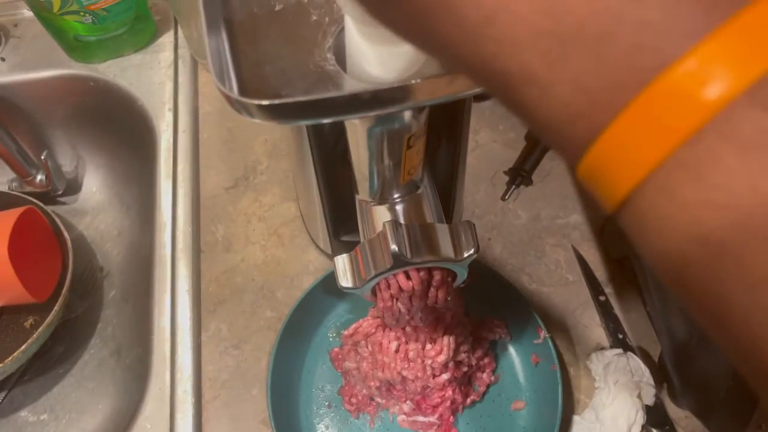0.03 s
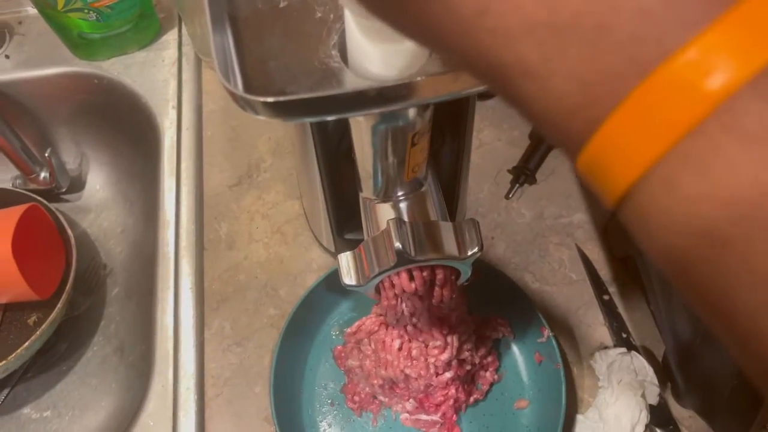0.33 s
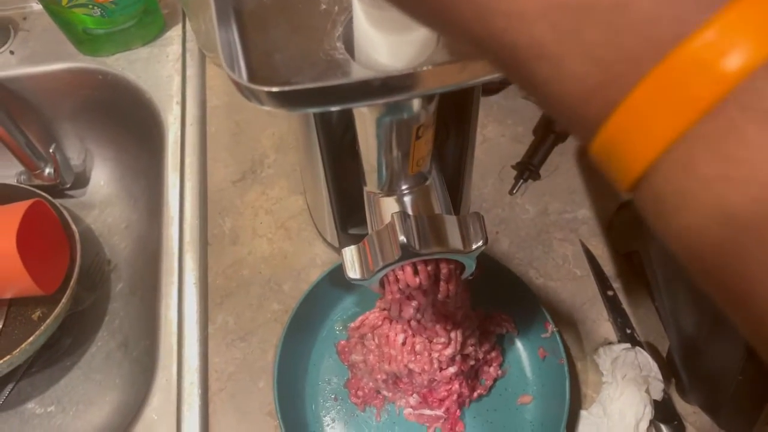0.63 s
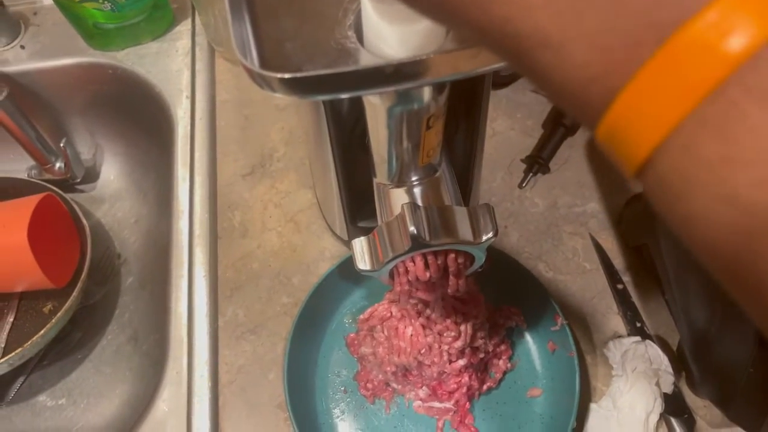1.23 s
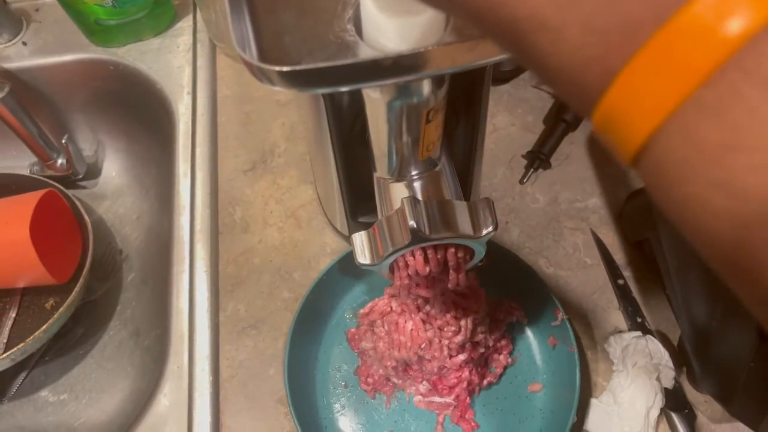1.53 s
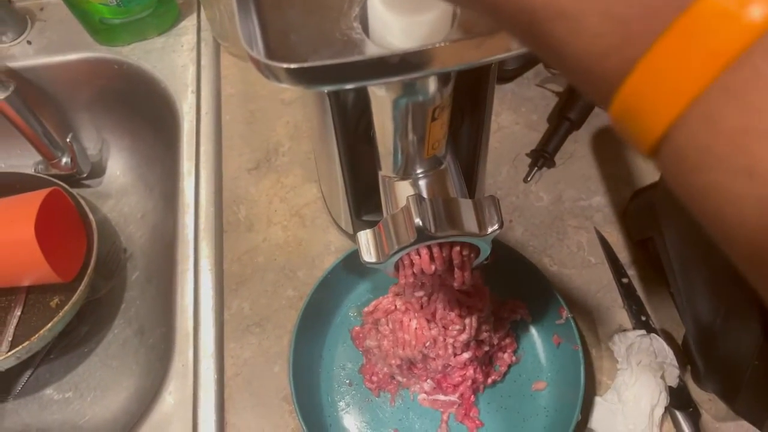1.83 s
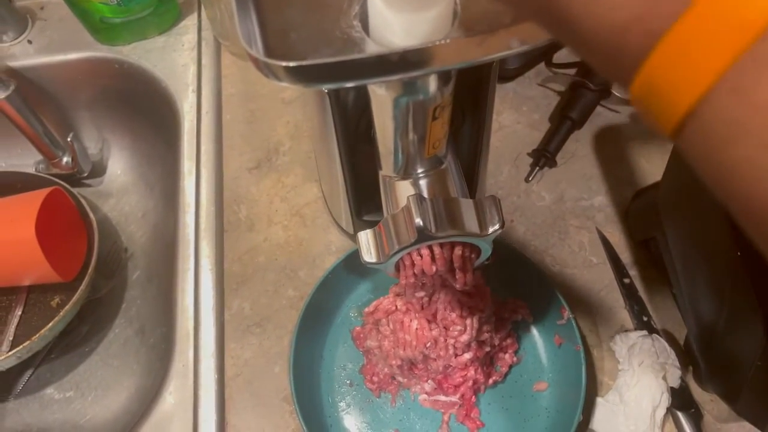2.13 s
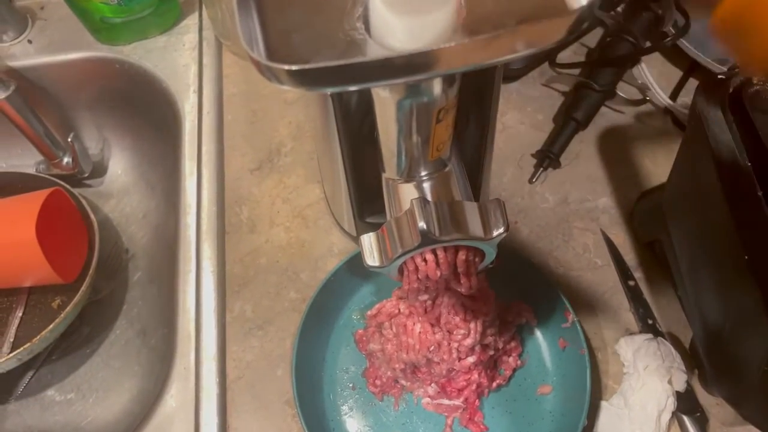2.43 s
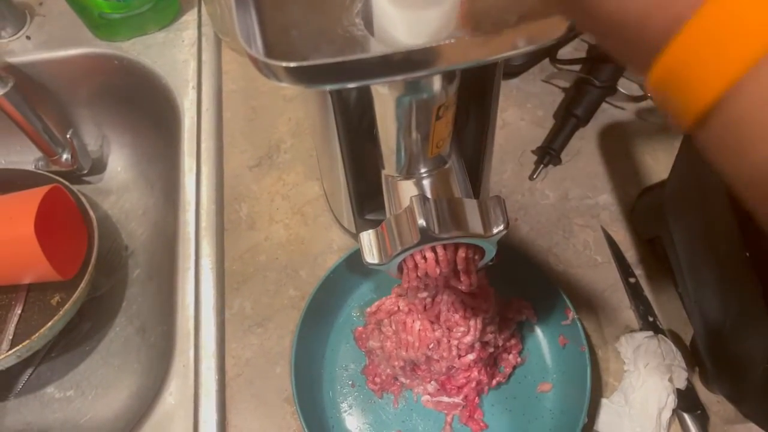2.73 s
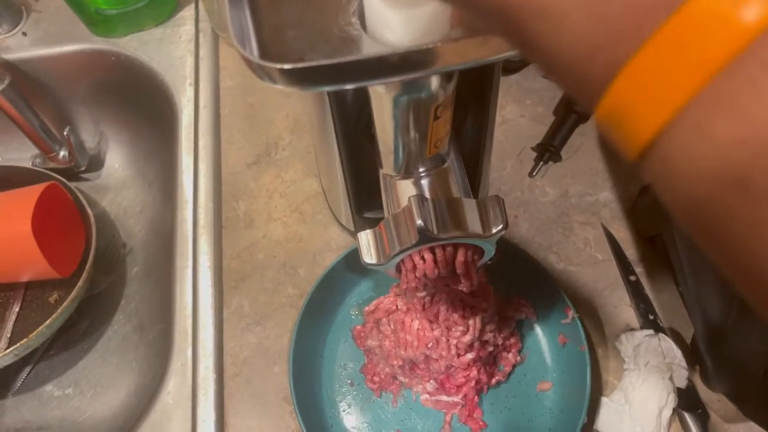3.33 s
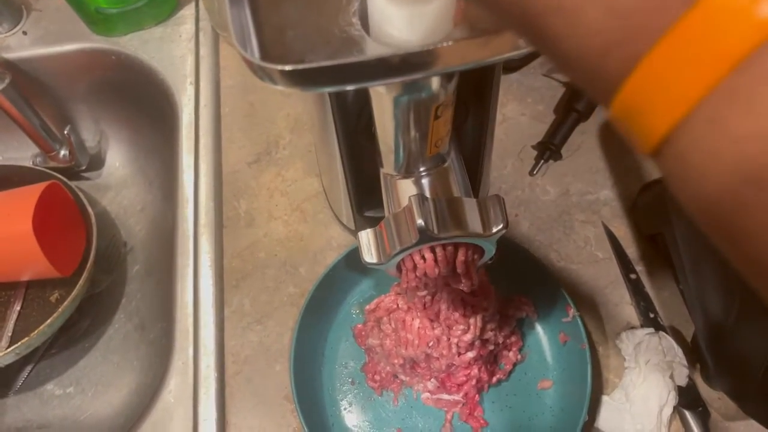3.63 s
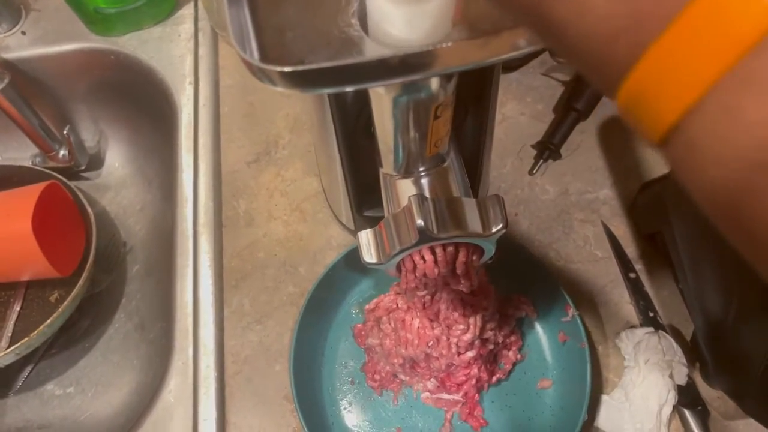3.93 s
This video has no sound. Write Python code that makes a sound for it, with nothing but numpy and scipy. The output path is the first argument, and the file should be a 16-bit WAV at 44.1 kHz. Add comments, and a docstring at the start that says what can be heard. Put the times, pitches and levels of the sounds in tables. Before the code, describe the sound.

An electric meat grinder runs close to the microphone on a kitchen counter. Its motor hums and whirs throughout while the gears rattle in uneven surges, with a few dry knocks, wet pops and faint metallic squeaks.

```python
"""A kitchen counter, with an electric meat grinder running close to a stereo microphone. Cooling air whirs, the
brushes hiss and meat crackles at the plate; the walls add a short tail. The auger rasps, the bearings squeak,
the drive whines and knocks, and housing resonances swell into short pulses. In front, the fast brush motor hums
at shaft speed and sags under load, while a small pinion rattles a larger gear, ringing the housing. The rattle
surges as the auger churns."""
import sys
import numpy as np
from scipy import signal
from scipy.fft import rfft, irfft, next_fast_len
from scipy.io import wavfile
from scipy.ndimage import map_coordinates

SR = 44100
rng = np.random.default_rng(int(sys.argv[2]) if len(sys.argv) > 2 else 0)


def to_wav(sig):
    """Store sig (one row per channel, or 1-D mono) as 16-bit WAV at the path in sys.argv[1].

    Samples outside -1..1 are clipped; the rate is SR.
    """
    pcm = np.clip(np.atleast_2d(sig), -1, 1) * 32767
    pcm = np.round(pcm).astype(np.int16)
    wavfile.write(sys.argv[1], SR, pcm.T)  # frames by channels


N = 176400
PINION_TEETH, GEAR_TEETH = 7, 54
# spectrum that the air and the knocks feed into the housing: f/Hz, relative level/dB
WHIR_SPECTRUM = [(20, -50), (42, -18), (90, -15), (125, -12), (165, -17), (240, -2.5), (330, -4), (520, -5),
                 (700, -6.5), (1000, -2), (1900, -2.5), (2400, 4), (3300, -.5), (4100, -2), (5000, -8),
                 (8000, -17), (14000, -49)]


def amp(db):
    """Decibels to gain."""
    return 10 ** (np.asarray(db) / 20)


def unit(x):
    """Scale to rms 1."""
    return x / np.sqrt(np.mean(x ** 2) + 1e-20)


def along(points, hz):
    """Read (f/Hz, value) points on a log frequency axis."""
    f, values = np.transpose(points)
    return np.interp(np.log(hz + 1), np.log(np.sort(f) + 1), values)


def wobble(rate):
    """A smooth random curve with `rate` knots a second."""
    return map_coordinates(rng.standard_normal(4096), [np.arange(N) * rate / SR + 2], mode="wrap")


def filtered(x, response):
    """Multiply the spectrum of x by response(f)."""
    size = next_fast_len(N + SR // 2)
    return irfft(rfft(x, size) * response(np.fft.rfftfreq(size, 1 / SR)), size)[..., :N]


def coloured(x, level_db):
    """A causal, minimum-phase filter with the gain level_db(f)."""
    size = 2 * next_fast_len(N)
    cepstrum = irfft(np.log(amp(level_db(np.fft.rfftfreq(size, 1 / SR)))), size)
    fold = np.r_[1, np.full(size // 2 - 1, 2), np.zeros(size // 2)]
    return irfft(rfft(x, size) * np.exp(rfft(cepstrum * fold)), size)[..., :N]


def bursts(events, t, t60_s):
    """A quickly dying burst of stereo noise for each (t/s, level/dB) event."""
    envelope = sum((t >= start) * amp(db - 60 * np.abs(t - start) / t60_s) for start, db in events)
    return envelope * rng.standard_normal((2, N))


def swell(offset, length):
    """A bell-shaped envelope, `length` wide at half power."""
    return .5 ** (2 * (offset / length) ** 2)


def panned(x, pan_db):
    """Place a signal pan_db louder on the left than on the right."""
    return x * amp(np.array([[pan_db], [-pan_db]]) / 2)


def spread(pair):
    """Two unrelated signals become the shared and the differing part at the microphone's two ports."""
    balance = [(60, 4), (250, 2), (390, 22), (540, 23), (760, 0.5), (950, 6.5), (1400, 4.5), (1900, 7),
               (2600, 2.5), (4000, 3), (4600, -5), (5900, 1), (7400, -4), (8500, -0.5)]  # tilt between the ports: f/Hz, left minus right/dB
    likeness = [(40, 0.82), (290, 0.97), (520, 0.19), (800, 1), (1400, 0.83), (2100, 0.084), (2600, 0.76),
                (3300, 0.61), (4300, 0.073), (6500, 0.68), (8500, 0.85), (9600, 0.77), (10300, 1),
                (11200, 0.55), (11800, 0.55)]  # how alike the ports sound: f/Hz, coherence/0..1
    angle = lambda f: np.arccos(np.clip(along(likeness, f), 0, 1)) / 2
    mid, side = filtered(pair, lambda f: np.array([np.cos(angle(f)), np.sin(angle(f))]))
    tilt = lambda f: amp(np.outer([1, -1], along(balance, f)) / 2)
    left_right = np.array([mid + side, mid - side])
    return filtered(left_right, lambda f: tilt(f) / np.sqrt(np.mean(tilt(f) ** 2, axis=0)))


def out_of_step(pair):
    """Sound reaches the microphone's two ports with different phases."""
    lead = [(30, .1), (280, .75), (470, .7), (560, -1.5), (800, -1), (2000, -1), (2600, -2.6), (3150, -2.8),
            (3600, -5.2), (3900, -5), (4200, -7.3), (4700, -6.5), (5500, -9.5), (5850, -12), (6400, -12.4),
            (7000, -15), (8400, -12.7), (8950, -12.4), (10300, -9.4), (11000, -8.2), (11700, -6.3)]  # phase between the ports: f/Hz, lead of the left/rad
    return filtered(pair, lambda f: np.exp(.5j * np.outer([1, -1], along(lead, f))))


def kitchen(pair, t60_s=.09, tail_db=-8.5):
    """The counter, sink and walls add a short tail."""
    t = np.arange(SR // 4) / SR
    tail = rng.standard_normal((2, len(t))) * amp(-60 * t / t60_s) * (t > .002)
    tail /= np.linalg.norm(tail[0])
    return pair + amp(tail_db) * signal.fftconvolve(pair, tail, axes=1)[:, :N]


def housing(force, spectrum):
    """A force, shaped by the given spectrum, heard through the ringing housing."""
    resonances = [(396, 43, 6), (531, 59, 11), (776, 43, 11), (1102, 97, 5.5), (1240, 27, 4.5),
                  (1403, 48, 4.5), (1736, 23, 8), (1945, 62, 5.5), (2350, 130, 3), (2598, 40, 7.5),
                  (2940, 40, 4.5), (3173, 113, 12), (3303, 55, 9), (3500, 160, 3), (3840, 120, 3.5),
                  (4030, 49, 3.5)]  # modes of the housing: f/Hz, width/Hz, lift/dB

    def lift_db(f):
        peaks = sum(abs(amp(db) ** 2 - 1) / (1 + (2 * (f - hz) / width) ** 2) ** 1.16
                    for hz, width, db in resonances)
        return 10 * np.log10(1 + peaks)
    return coloured(force, lambda f: along(spectrum, f) + lift_db(f))


def whir(level_db=-26, waver_db=.6):
    """Cooling air and bearings: a wavering rush through the housing."""
    rush = rng.standard_normal((2, N)) * amp(waver_db * wobble(27.9))
    return amp(level_db) * unit(spread(kitchen(housing(rush, WHIR_SPECTRUM))))


def brushes(speed, level_db=-35, grain_db=2.7, db_per_hz=.13):
    """Carbon scrapes on the commutator: a grainy hiss that grows with speed."""
    spectrum = [(2000, -30), (4800, -6), (5900, 0), (6300, -4), (6900, -1), (7400, -4), (7900, -2),
                (8200, -4), (9000, 0), (9400, 1), (9520, 5), (9650, 0), (10200, -2), (10750, 3),
                (11300, -2), (12000, -11), (13000, -28)]  # brush hiss: f/Hz, relative level/dB
    scrape = rng.standard_normal((2, N)) * amp(grain_db * wobble(950) + db_per_hz * (speed - speed.mean()))
    hiss = coloured(scrape, lambda f: along(spectrum, f))
    return amp(level_db) * unit(spread(kitchen(hiss)))


def meat_pops(t):
    """Meat crackles at the plate in bright, wet pops."""
    pops = [(.649, -23), (.672, -14), (.679, -14), (.962, -13), (3.291, -8.3)]  # wet pops: t/s, level before filtering/dB
    spectrum = [(500, -22), (3000, -8), (7200, -7), (8700, 0), (11500, -4), (15000, -17)]  # colour of a pop: f/Hz, gain/dB
    return coloured(bursts(pops, t, t60_s=.014), lambda f: along(spectrum, f))


def drive_knocks(t):
    """Dry knocks in the drive ring the housing."""
    knocks = [(.498, -16), (.686, -33), (.927, -23), (1.159, -19), (1.996, -13)]  # blows in the drive: t/s, level before filtering/dB
    return housing(bursts(knocks, t, t60_s=.018), WHIR_SPECTRUM)


def bearing_squeaks(t):
    """As the load eases, the bearings squeal: metal slips on metal in short, unsteady glides."""
    slips = [(2.465, .055, 3330, 3600, -38), (2.495, .08, 4150, 4115, -35), (2.565, .05, 3650, 3200, -38),
             (2.56, .07, 2340, 2350, -35), (2.59, .13, 2610, 2630, -38), (3.065, .05, 3130, 3280, -32.5)]  # squeaks: t/s, length/s, start f/Hz, end f/Hz, level/dB
    squeaks = np.zeros(N)
    for start, length, start_hz, end_hz, db in slips:
        progress = np.clip((t - start) / length, 0, 1)
        hz = start_hz + (end_hz - start_hz) * progress + 16 * wobble(300)
        tone = np.sqrt(2) * np.sin(2 * np.pi * np.cumsum(hz) / SR)
        squeaks += amp(db) * np.sin(np.pi * progress) * tone
    return panned(squeaks, pan_db=2.5)


def auger_rasps(t):
    """The auger rubs in its barrel: brief rasping swells through the housing."""
    rubs = [(.125, .02, -29), (.505, .03, -29), (.85, .07, -30.5), (.99, .06, -31), (1.165, .03, -27.5),
            (2.372, .02, -29), (2.85, .025, -30), (3.15, .025, -30), (3.22, .02, -28), (3.962, .055, -28)]  # rasps: centre t/s, length/s, level/dB
    spectrum = [(600, -40), (1300, -14), (1600, 0), (2100, -1), (2450, -6), (3000, -22), (6000, -40)]  # rubbing force: f/Hz, relative level/dB
    envelope = sum(amp(db) * swell(t - centre, length) for centre, length, db in rubs)
    return envelope * unit(spread(housing(rng.standard_normal((2, N)), spectrum)))


def drive_whine(t, hz=3102, pulse_db=3.6, smear_rad=1.05):
    """A narrow, pulsing metallic whine of the drive comes and goes, right of centre."""
    contour = [(0, -40), (.3, -36.5), (.7, -39.5), (1.25, -38), (1.9, -40), (2.5, -46), (3.1, -43),
               (3.65, -38.5), (4, -42)]  # course of the whine: t/s, level/dB
    level_db = np.interp(t, *np.transpose(contour)) + pulse_db * wobble(45)
    tone = np.sqrt(2) * np.sin(2 * np.pi * hz * t + smear_rad * wobble(70))
    return panned(amp(level_db) * tone, pan_db=-5)


def panel_rings(speed, t):
    """Shaken at random, the freest panels sound fluttering tones, most changing in level with speed."""
    # ringing panels: f/Hz, flutter rate/Hz, level/dB, slope/(dB per Hz of speed), left minus right/dB
    panels = [(1416, 50, -43.5, 1, 2), (1747, 51, -49.5, -1.5, 8), (1909, 55, -45.5, 0, 10),
              (2333, 50, -48, 1, 11.5), (3520, 50, -52.5, 2.8, 2)]
    excess_hz = np.clip(speed - speed.mean(), -3, 3)
    rings = np.zeros((2, N))
    for hz, rate, db, slope, pan_db in panels:
        flutter = wobble(rate) + 1j * wobble(rate)
        tone = unit(np.real(flutter * np.exp(2j * np.pi * hz * t)))
        rings += panned(amp(db + slope * excess_hz) * tone, pan_db)
    return rings


def housing_pings(t, gain_db=-1.5):
    """The gears bear hard for a moment and one housing resonance swells into a clear tone."""
    pulses = [(.21, 0.024, 3130, -28), (.255, .05, 1125, -36), (0.286, 0.012, 3110, -24),
              (0.43, .015, 3115, -24), (0.506, .016, 1740, -36), (0.506, .04, 1122, -33.5),
              (0.582, .035, 1410, -35), (0.692, .016, 1420, -32), (.735, 0.032, 1120, -29),
              (0.862, 0.017, 1405, -33), (0.96, 0.029, 1396, -35), (0.99, .029, 1122, -31),
              (1.055, .015, 3110, -26), (1.092, 0.022, 1140, -33), (1.156, 0.029, 1740, -38),
              (1.19, 0.024, 1115, -25), (1.255, 0.041, 3110, -35), (1.48, 0.021, 1123, -29.5),
              (1.63, 0.049, 1140, -30), (1.673, .015, 3060, -32), (1.927, 0.02, 1123, -30),
              (2.02, 0.014, 1128, -26.5), (2.231, 0.016, 1740, -36), (2.232, .054, 1120, -31.5),
              (2.319, 0.013, 1420, -27), (2.39, 0.032, 1128, -30), (2.624, 0.011, 1388, -26),
              (2.733, 0.013, 1410, -31.5), (2.852, .016, 1420, -29), (2.862, .016, 1146, -36),
              (3.128, 0.015, 1420, -31.5), (3.222, 0.025, 1410, -29.5), (3.29, 0.017, 3080, -26.5),
              (3.337, 0.055, 1128, -35), (3.593, .033, 3120, -35), (3.664, 0.031, 1140, -35),
              (3.768, 0.019, 1410, -28), (3.974, 0.019, 1420, -29)]  # pitched pulses: centre t/s, length/s, f/Hz, relative level/dB
    pings = np.zeros(N)
    for centre, length, hz, db in pulses:
        tone = np.sqrt(2) * np.sin(2 * np.pi * hz * t + rng.uniform(0, 2 * np.pi))
        pings += amp(db + gain_db) * swell(t - centre, length) * tone
    return panned(pings, pan_db=6.5)


def rotation_tones(turns, partials, smear_rate, waver_db=3.37):
    """Multiples of a rotation, each blurred by play in the gears."""
    tones = np.zeros((2, N))
    for multiple, db, smear_rad, pan_db in partials:
        gain = amp(db + waver_db * wobble(14))
        phase = 2 * np.pi * multiple * turns + smear_rad * wobble(smear_rate)
        tones += panned(gain * unit(np.sin(phase)), pan_db)
    return tones


def motor(turns, speed, shake, hum_db=-35, db_per_hz=.3, waver_db=1.36, smear_rad=.1):
    """The rotor's unbalance gives a clean hum; its overtones and the gear tones are rougher."""
    # tones of shaft and gear: multiple of its own speed, level/dB, phase smear/rad, left minus right/dB
    shaft_partials = [(2, -61, 0.28, 16), (6, -47, 0.61, 13), (7, -50.5, 1, 2), (8, -50, 1, 11.5),
                      (9, -47, 1, 8.5), (12, -43, 0.65, 3), (13, -45, 0.66, 5), (14, -54, 0.76, 7),
                      (16, -55.5, 0.91, -3), (24, -58, .8, 5)]
    gear_partials = [(10, -49, 0.6, 6.5), (11, -52.5, 0.94, 9), (14, -48, 0.95, 10), (15, -47.5, 0.73, 9),
                     (30, -43, 0.74, -6)]
    level_db = hum_db + db_per_hz * (speed - speed.mean()) + waver_db * wobble(21.83)
    hum = amp(level_db) * unit(np.sin(2 * np.pi * turns + smear_rad * wobble(40)))
    overtones = rotation_tones(turns, shaft_partials, smear_rate=55)
    gear_tones = rotation_tones(turns * PINION_TEETH / GEAR_TEETH, gear_partials, smear_rate=35)
    return panned(hum, pan_db=4.5) + overtones + shake * gear_tones


def auger_surges(t, base_db=5.2):
    """How far the churning auger lifts the rattle above its mean, in dB."""
    surges = [(0.046, 0.05, -3.5), (0.242, 0.093, 0), (0.326, 0.081, -3.5), (0.512, 0.041, -1.5),
              (0.595, 0.046, -1.5), (0.726, 0.059, -2.5), (0.858, 0.015, 1), (0.955, 0.1, -0.8),
              (1.093, 0.026, -1), (1.172, 0.014, 3), (1.316, 0.016, -3), (1.433, 0.033, -3),
              (1.647, 0.089, -1.5), (1.907, 0.027, -1.5), (2.22, 0.2, -3.5), (2.376, .06, -4.5),
              (2.656, 0.029, -2.5), (2.77, 0.054, -1), (2.85, 0.038, -0.5), (3.0, .05, -3.5),
              (3.221, 0.035, -4), (3.323, 0.092, -3.5), (3.68, 0.073, -2), (3.778, 0.024, 1.5),
              (3.965, 0.028, -2)]  # surges of the rattle: centre t/s, length/s, height relative to base_db/dB
    lift_db = sum((base_db + db) * swell(t - centre, length) ** 2 for centre, length, db in surges)
    return lift_db - lift_db.mean()


def gear_rattle(turns, surge_db, t, level_db=-29, flutter_db=1.2, jitter_s=.00016):
    """Each tooth strikes a little early or late, harder on worn teeth and in the surges."""
    spectrum = [(100, -42), (300, -20), (650, -13), (880, -1), (1150, 2), (1580, -2), (2050, -4),
                (2600, -14), (3600, -19), (4600, -26), (8000, -34), (14000, -50)]  # force of the teeth: f/Hz, relative level/dB
    tooth = np.arange(int(turns[-1] * PINION_TEETH))
    wear = rng.standard_normal((2, GEAR_TEETH))[:, tooth % GEAR_TEETH]  # repeats with each gear turn
    timing, scatter = np.split(rng.standard_normal((9000, 4))[:len(tooth)].T, 2)
    strike_s = np.interp(tooth / PINION_TEETH, turns, t) + jitter_s * timing
    samples = np.clip(strike_s * SR, 0, N).astype(int)
    forces = np.exp(.13 * wear + .35 * scatter)
    blows = np.array([np.bincount(at, force, N + 1)[:N] for at, force in zip(samples, forces)])
    blows = (blows - blows.mean()) * amp(surge_db + flutter_db * wobble(32.72))
    return amp(level_db) * unit(spread(kitchen(housing(blows, spectrum))))


def scene():
    """The whole grinder from close by; most parts reach the two ports out of step."""
    shaft_speed = [(0, 282.9), (0.17, 288.2), (0.4, 292.3), (0.75, 288.9), (1.1, 291.0), (1.25, 289.2),
                   (1.42, 290.8), (1.63, 283.9), (1.85, 289.0), (1.95, 286.9), (2.1, 291.0), (2.3, 289.1),
                   (2.52, 294.0), (3.1, 293.0), (3.35, 292.0), (3.62, 293.1), (3.8, 288.4), (4, 292.0)]  # motor speed, sagging under load: t/s, rotation f/Hz
    t = np.arange(N) / SR
    speed = np.interp(t, *np.transpose(shaft_speed)) + .3 * wobble(14)
    turns = np.cumsum(speed) / SR
    surge_db = auger_surges(t)
    shake = amp(.47 * surge_db)  # the share of each surge that reaches the panels and gear tones
    impacts = spread(meat_pops(t) + drive_knocks(t))
    running = motor(turns, speed, shake) + gear_rattle(turns, surge_db, t) + whir() + brushes(speed)
    body = out_of_step(running + impacts + housing_pings(t) + auger_rasps(t))
    return body + shake * panel_rings(speed, t) + drive_whine(t) + bearing_squeaks(t)


def record(dry, top_hz=13000):
    """The microphone's signal is cut off steeply above the band limit."""
    return filtered(dry, lambda f: 1 / np.sqrt(1 + (f / top_hz) ** 80))


dry = scene()
out = record(dry)
to_wav(out)
```